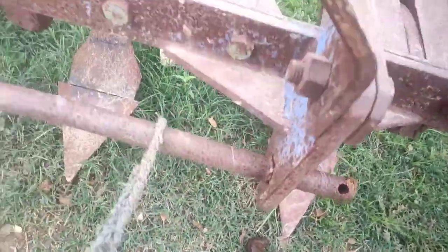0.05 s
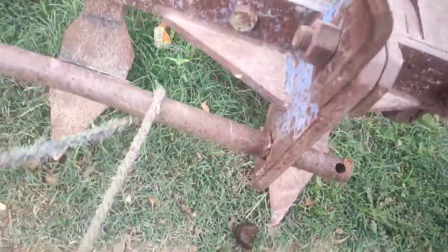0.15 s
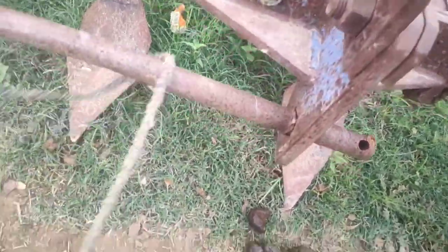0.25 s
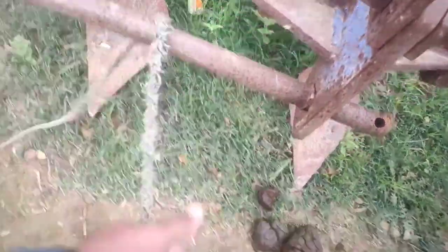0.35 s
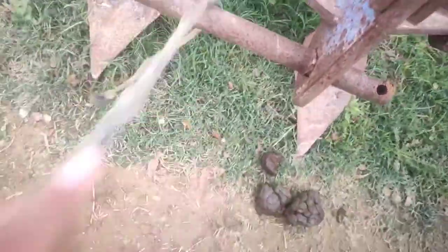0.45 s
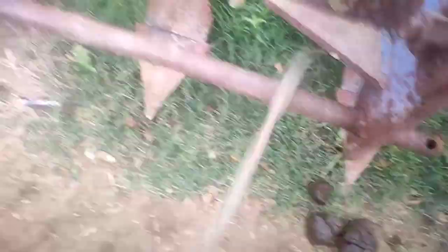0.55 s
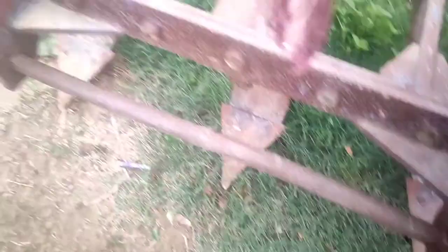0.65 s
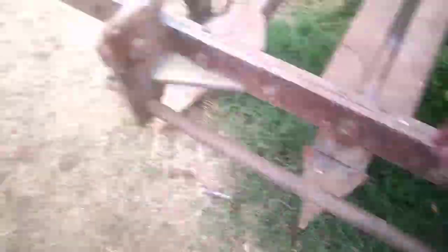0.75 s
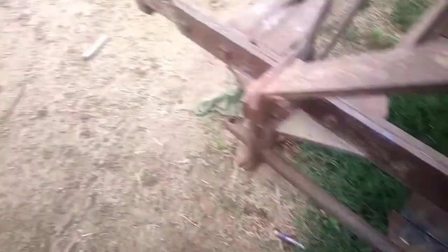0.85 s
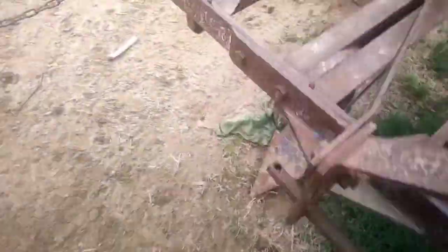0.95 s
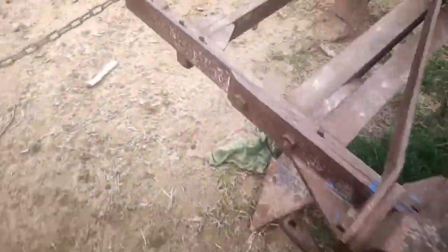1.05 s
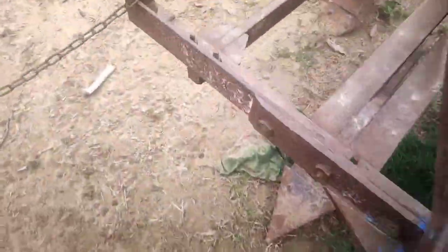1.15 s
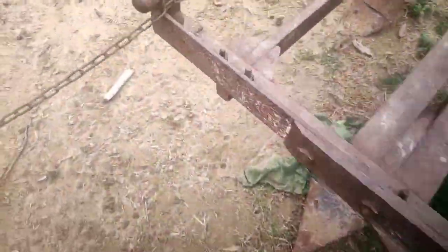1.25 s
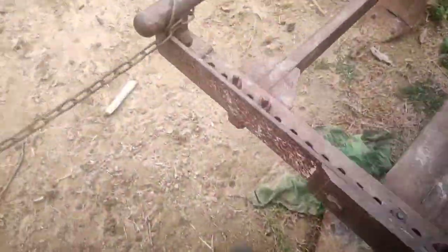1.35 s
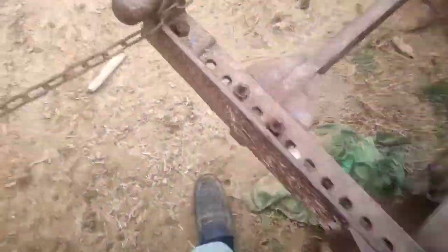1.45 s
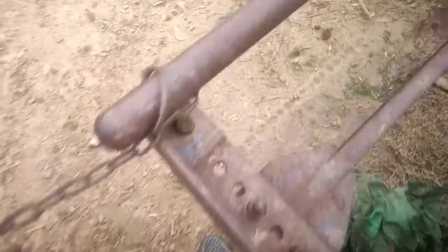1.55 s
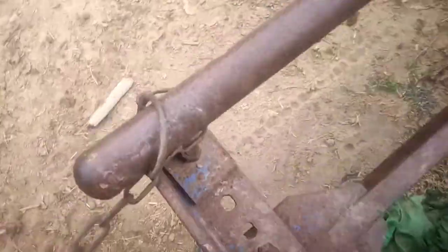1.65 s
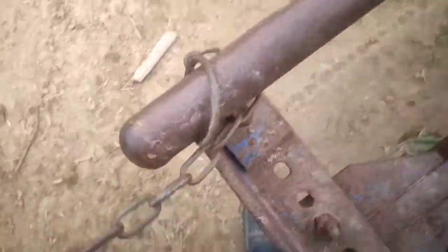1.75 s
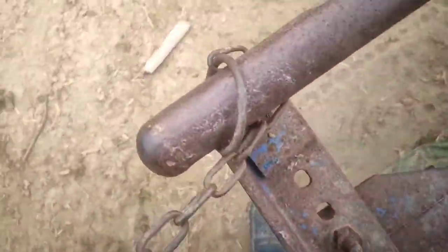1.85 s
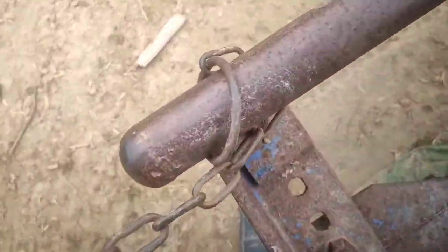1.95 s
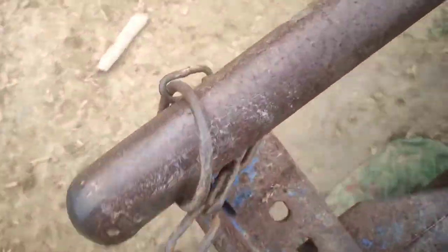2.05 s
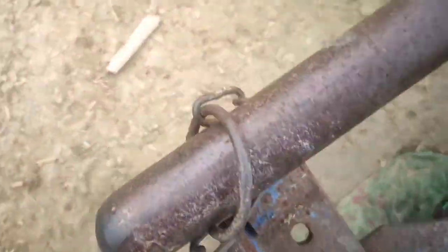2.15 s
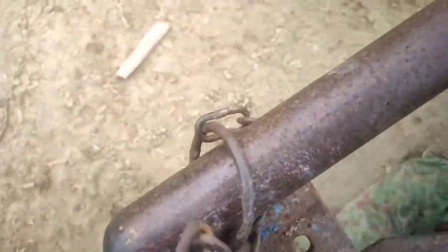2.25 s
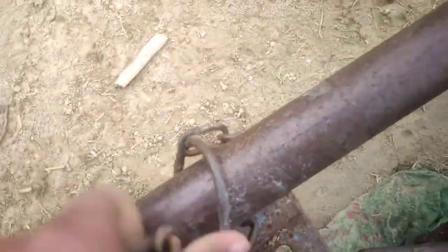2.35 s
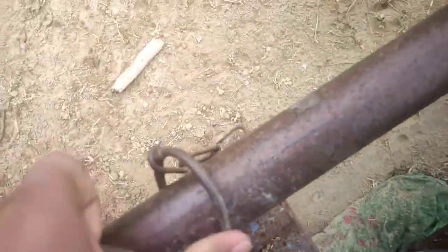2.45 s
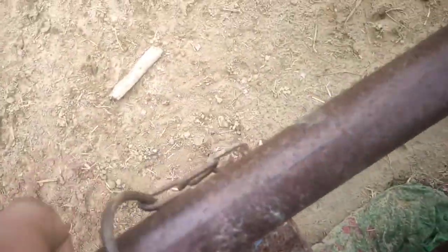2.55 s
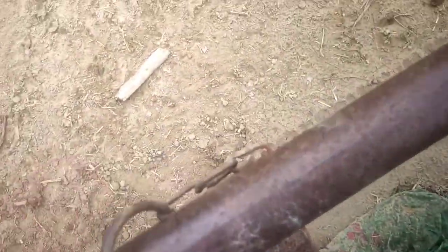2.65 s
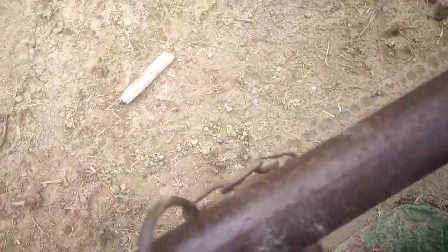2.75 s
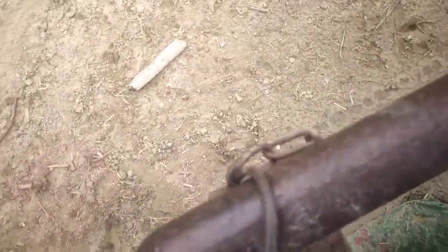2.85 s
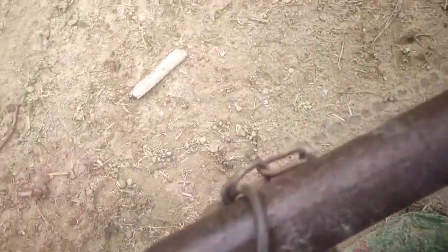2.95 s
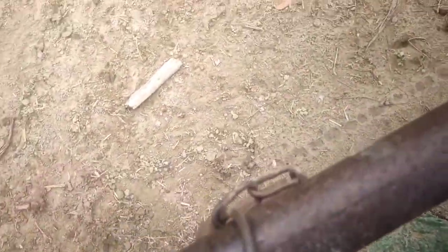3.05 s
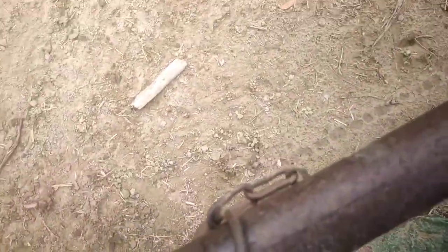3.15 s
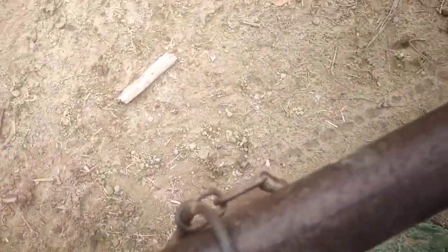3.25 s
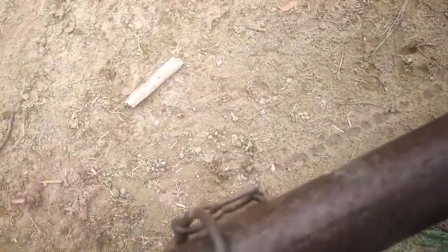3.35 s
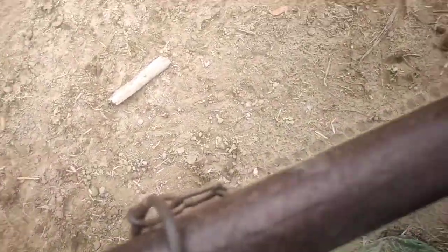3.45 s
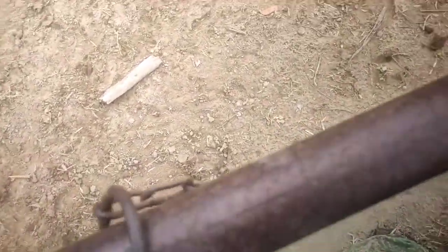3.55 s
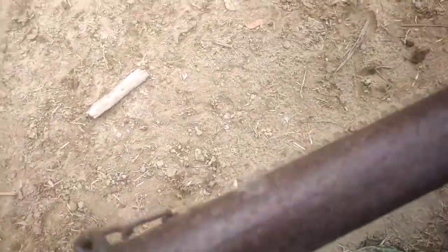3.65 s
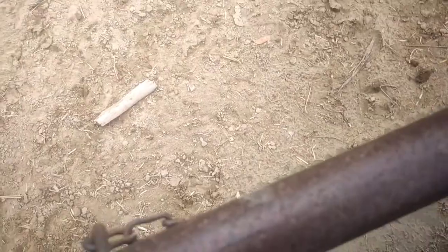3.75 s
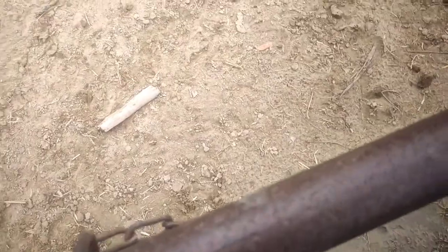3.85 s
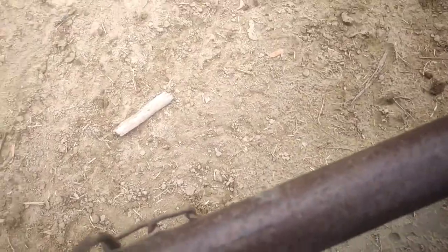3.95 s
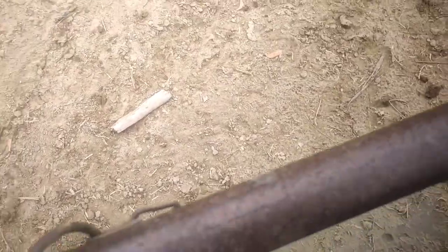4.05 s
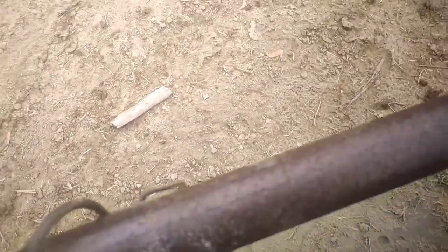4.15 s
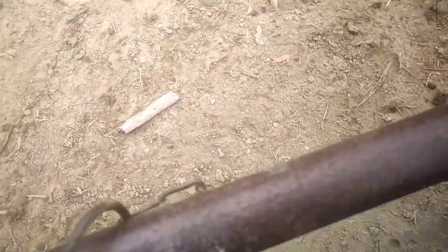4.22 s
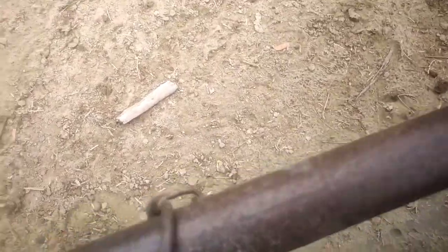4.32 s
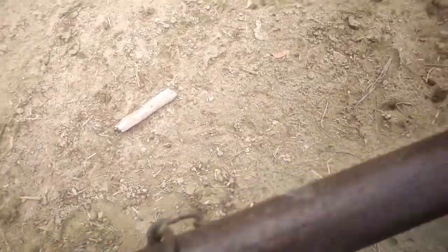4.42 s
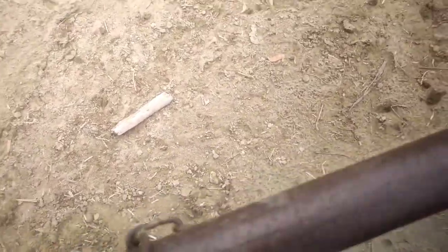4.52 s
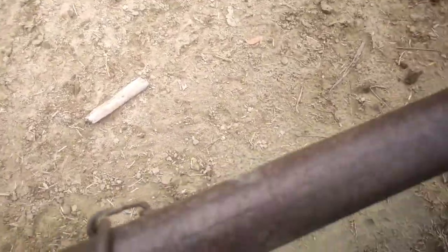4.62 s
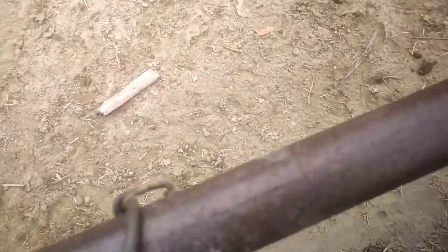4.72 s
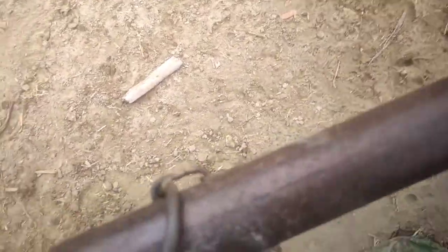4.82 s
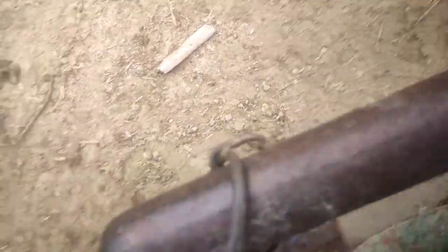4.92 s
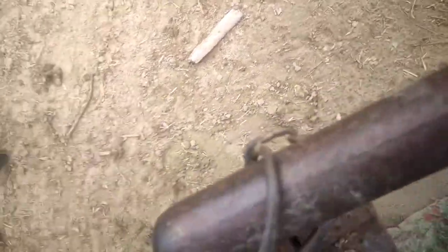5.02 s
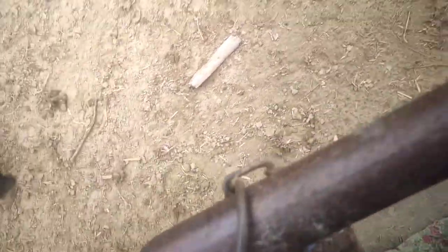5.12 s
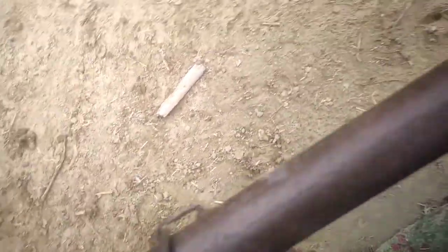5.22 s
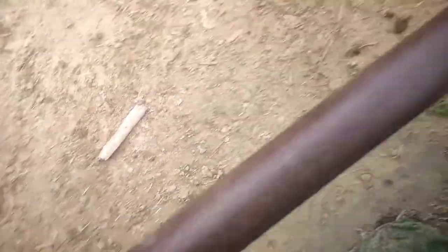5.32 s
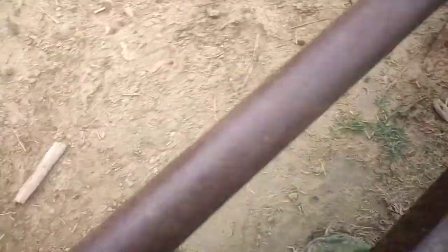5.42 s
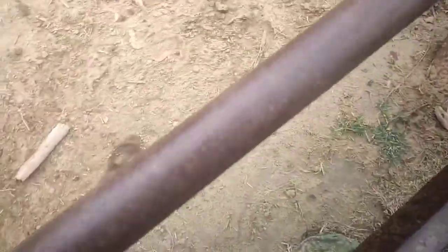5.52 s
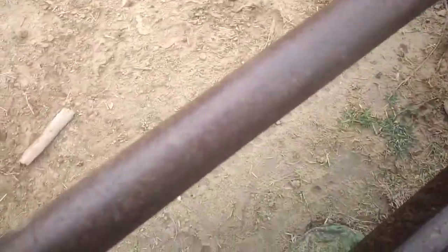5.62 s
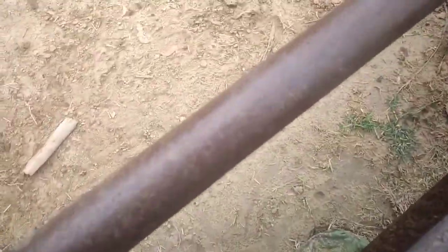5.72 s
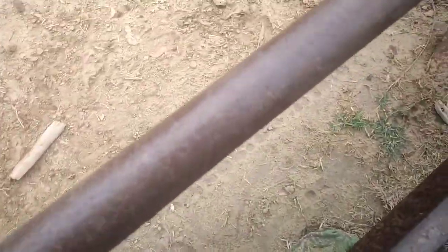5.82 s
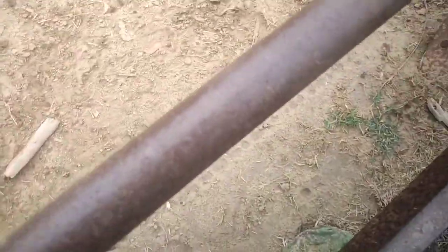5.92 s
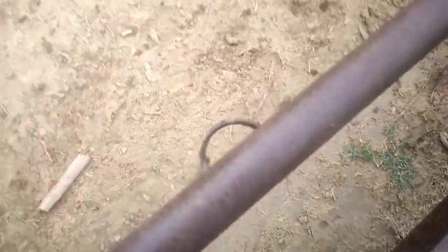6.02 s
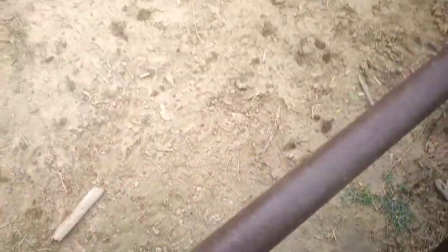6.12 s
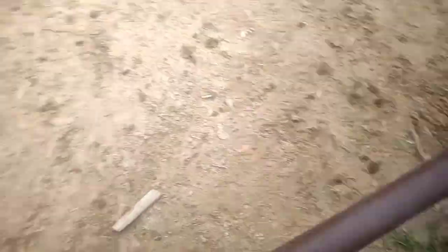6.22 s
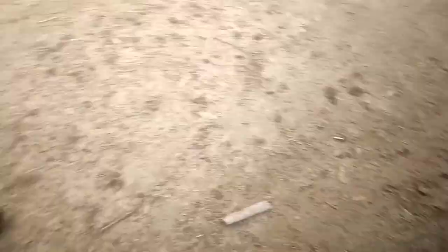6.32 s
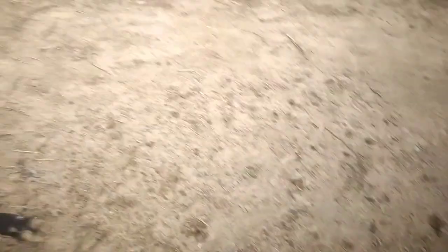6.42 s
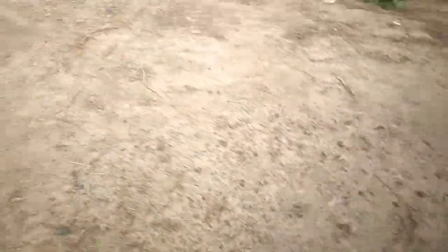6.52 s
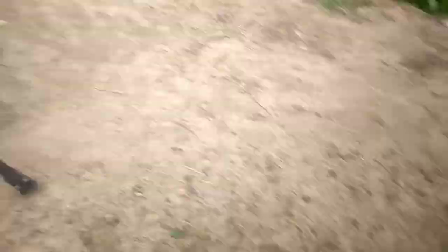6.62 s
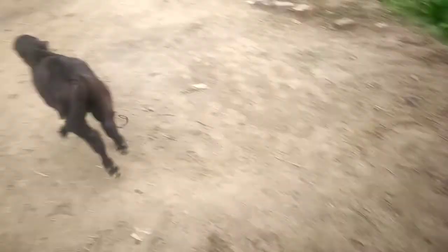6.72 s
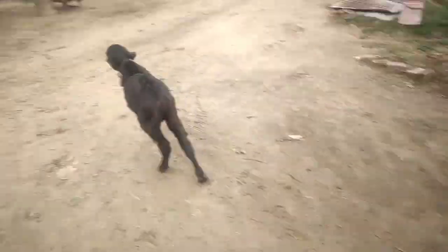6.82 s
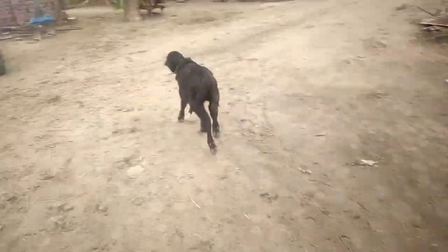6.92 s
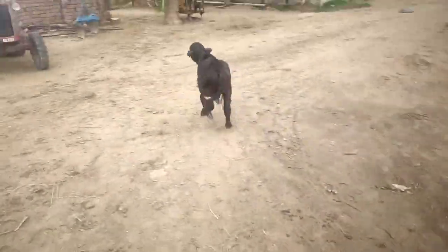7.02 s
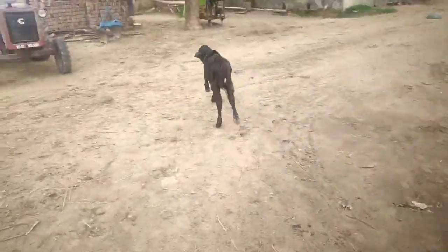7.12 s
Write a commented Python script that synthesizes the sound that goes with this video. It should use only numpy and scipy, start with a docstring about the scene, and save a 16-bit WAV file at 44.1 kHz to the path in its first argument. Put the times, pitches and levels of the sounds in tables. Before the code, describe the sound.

Close, dry stereo sound with no echo: lumpy wind rumble and muffled footsteps first, brushing grass, a crisp snap. Next, small iron links tick and scrape, with sharper clinks now and then, one ringing hard midway. Later the hook strikes twice in strong clusters, high and piercing, with a harsh chain drag and heavy iron knock. It stops quickly, leaving faint steps, light rustle and thin hiss.

```python
"""A farmyard in the open air: a chain and its hook clink, scrape and ring on a rusty iron bar.
Clinks are noise cracks that excite decaying iron modes; the hook is a set of close, beating modes, and two
thin high tinks share its top modes. The drag is uneven grit with small catches that ring the iron.
Gusts of low noise buffet two microphones. Dull steps and knocks on the iron and its frame are puffs of
pitched noise; rustling grass and dry snaps are shaped noise."""
import sys
import numpy as np
from scipy import signal
from scipy.fft import rfft, irfft
from scipy.io import wavfile
from scipy.ndimage import uniform_filter1d

SR = 44100
rng = np.random.default_rng(int(sys.argv[2]) if len(sys.argv) > 2 else 0)


def to_wav(sig):
    """Store sig (one row per channel, or 1-D mono) as 16-bit WAV at the path in sys.argv[1].

    Samples outside -1..1 are clipped; the rate is SR.
    """
    pcm = np.clip(np.atleast_2d(sig), -1, 1) * 32767
    pcm = np.round(pcm).astype(np.int16)
    wavfile.write(sys.argv[1], SR, pcm.T)  # frames by channels


N = 316197

# modes of bar, frame and links: freq_hz, level_db, t60_s
IRON_MODES = [(340, -10, .1), (660, -8, .12), (764, -10, .12), (1250, -12, .09), (1520, -8, .16),
              (1665, -3, .1), (2610, -2, .04), (2860, -4, .1), (3070, 0, .08), (3500, -3, .06),
              (4240, -6, .12), (4500, 0, .06), (4900, -4, .05), (5464, -5, .08), (5720, -4, .05),
              (6240, -2, .06), (6750, -3, .06), (7700, 0, .045), (8700, -2, .035), (9340, -3, .05),
              (9760, -2, .06), (10050, -2, .05), (10900, 1, .06), (11220, 1, .055), (11800, 0, .06),
              (12200, -1, .07), (12850, -1, .07), (13350, -3, .055), (14200, -2, .055), (14900, -1, .06)]
# the chain dragging over iron: time_s, level_db
DRAG_LEVELS = [(1.66, -65), (1.7, -54), (1.93, -66.5), (2.23, -60.5), (2.32, -64.5), (2.4, -50),
               (2.62, -54.5), (2.72, -60), (2.78, -59.5), (2.95, -60.5), (3.53, -61.5), (3.83, -57.5),
               (4.01, -58.5), (4.34, -59.5), (4.48, -56.5), (4.58, -84), (4.76, -79.5), (4.8, -57),
               (5.23, -70), (5.36, -58), (5.5, -52.5), (5.72, -47), (5.76, -21), (5.86, -31.5),
               (5.93, -40.5), (5.99, -20), (6.09, -34.5), (6.13, -59), (6.33, -56.5), (6.4, -82)]


def gain_of(db):
    """Decibels to gain."""
    return 10 ** (np.asarray(db) / 20)


def evened(x):
    """Scales to rms 1."""
    return x / np.sqrt(np.mean(abs(x) ** 2) + 1e-20)


def read(points, hz):
    """Reads a spectrum in dB, interpolated along log frequency."""
    f, value = np.transpose(points)
    return np.interp(np.log(hz + 1), np.log(f + 1), value)


def sides(pan_db):
    """Left and right gains from a left-right level difference."""
    return gain_of(np.array([pan_db / 2, -pan_db / 2]))


def add(mix, s, sound):
    """Mixes a sound in at a time in seconds."""
    part = mix[:, round(s * SR):][:, :sound.shape[1]]
    part += sound[:, :part.shape[1]]


def coloured(x, points, at, tilt, pivot_hz, size):
    """Filters x to a spectrum whose tilt (dB per octave) moves over time, at constant power."""
    overlap = size * 3 // 4
    hz, t, z = signal.stft(x, SR, nperseg=size, noverlap=overlap)
    octaves = np.log2((hz[:, None] + 10) / pivot_hz)
    shape = gain_of(read(points, hz)[:, None] + octaves * np.interp(t, at, tilt))
    shape = shape / np.sqrt((shape ** 2).mean(0))
    return signal.istft(z * shape, SR, nperseg=size, noverlap=overlap)[1][:, :N]


def rings(modes, length, detune=1):
    """One exponentially decaying complex tone per mode; length in seconds."""
    t = np.arange(round(length * SR)) / SR
    hz, db, t60 = np.array(modes).T[:3, :, None]
    return gain_of(db - 60 * t / t60) * np.exp(2j * np.pi * hz * np.reshape(detune, (-1, 1)) * t)


def detuned_iron(length):
    """Iron modes shifted slightly at random, since no two links are quite alike."""
    return rings(IRON_MODES, length, 1 + .015 * rng.standard_normal(len(IRON_MODES)))


def random_phases(count):
    """Gives each microphone its own phase for every mode."""
    return np.exp(2j * np.pi * rng.random((2, count)))


def hiss():
    """The steady noise floor of yard and microphones."""
    # floor spectrum: freq_hz, relative_db
    floor_spectrum = [(180, -30.5), (300, -5), (399, -12.5), (820, -12.5), (3530, -19), (5640, -16.5),
                      (13000, -15.5), (15400, -18), (16500, -39)]
    level_db = -66.5
    noise = rng.standard_normal((2, N))
    return gain_of(level_db) * coloured(noise, floor_spectrum, [0], [0], 1000, size=1024)


def wind():
    """Lumpy low noise, unrelated at the two sides: a breeze, gusts, and one low thump under a blow."""
    # gusts, and at 4.18 s the low thump under a blow: peak_time_s, level_db, left_right_db
    low_swells = [(.33, -34, -19.5), (.42, -47.5, -21), (0.521, -37.5, -12), (.58, -38, 3), (.68, -64, 8),
                  (0.818, -37.5, -1), (.87, -42, 2), (0.969, -36.5, -3), (1.05, -40, -3), (1.12, -48, 4),
                  (1.24, -58, -8), (1.559, -45.5, -9), (1.86, -57.5, -15), (4.18, -47, -5),
                  (4.729, -45, -4), (6.692, -41, -11)]
    # breeze: time_s, level_db
    breeze = [(0, -40.5), (1.05, -41.5), (1.4, -45.5), (2.45, -51), (3.3, -48.5), (4.1, -50), (4.55, -50.5),
              (5, -49.5), (5.4, -51), (6, -50.5), (6.35, -46.5), (7.17, -50)]
    # buffeting spectrum before tilt: freq_hz, relative_db
    buffet = [(8.8, -25.5), (15, 0), (61, -2.5), (183, -16.5), (409, -33), (454, -32), (597, -50),
              (900, -44.5), (1170, -69), (1980, -120)]
    rise_s, fall_s, breeze_pan_db = 0.029, 0.035, -2
    # stronger noise reaches higher: tilt in dB per octave at -48 dB, and its rise per dB of level
    tilt_db, tilt_per_db = -2.5, 0.2063
    t = np.arange(N) / SR
    wander = uniform_filter1d(uniform_filter1d(rng.standard_normal((2, N)), 900), 900)
    lumps = gain_of(1.1 * evened(wander))
    level = gain_of(np.interp(t, *np.transpose(breeze))) * sides(breeze_pan_db)[:, None]
    for s, db, pan_db in low_swells:
        swell = np.exp(-((t - s) / np.where(t < s, rise_s, fall_s)) ** 2)
        level = level + swell * gain_of(db) * sides(pan_db)[:, None]
    tilt = tilt_db + tilt_per_db * (20 * np.log10(level.mean(0)) + 48)
    noise = rng.standard_normal((2, N))
    return coloured(noise, buffet, t, tilt, 60, size=2048) * lumps * level


def thuds():
    """Dull low steps, iron knocks and a frame thud: a decaying puff of noise in a band around one pitch."""
    # thuds: start_s, peak_db before panning, pitch_hz
    dull_hits = [(0.09, -46.5, 283), (0.326, -37, 390), (0.384, -47, 288), (0.528, -37, 323),
                 (0.688, -52, 370), (0.784, -48, 270), (0.948, -37, 268), (1.83, -51, 283),
                 (1.935, -43.5, 312), (3.034, -48.5, 350), (5.465, -33, 840), (5.466, -32, 129),
                 (6.018, -17, 796), (6.023, -21, 130), (6.025, -28, 44.6), (6.05, -17, 800),
                 (6.531, -53, 363), (6.595, -49.5, 283), (6.651, -44, 301), (6.673, -38.5, 314),
                 (6.81, -49.5, 717), (6.888, -41.5, 296), (6.954, -47, 770), (7.066, -55.5, 300),
                 (7.14, -48.5, 908)]
    decay_cycles, shortest_t60_s, pan_db = 16, 0.025, -0.5
    out, t = np.zeros((2, N)), np.arange(4000) / SR
    for s, db, hz in dull_hits:
        band = signal.butter(2, [hz * .55, hz * 1.5], "band", fs=SR, output="sos")
        # mostly shared by both sides, with a little of its own on each
        push = rng.standard_normal(4000) + .5 * rng.standard_normal((2, 4000))
        fall = gain_of(-60 * t / max(decay_cycles / hz, shortest_t60_s))
        puff = signal.sosfilt(band, push * fall)
        add(out, s, puff / abs(puff).max() * gain_of(db) * sides(pan_db)[:, None])
    return out


def shuffle():
    """Feet and rope brushing dry grass and dust: a fine, slightly uneven rustle that rings nothing."""
    # rustle: time_s, level_db, tilt_db_per_octave
    rustle_levels = [(0, -51, 9), (.1, -67.5, 6.5), (.29, -54.5, 8), (.58, -53.5, 5), (.66, -68, 1),
                     (1.271, -66, 6), (1.29, -57.5, 3), (1.37, -49, 4.5), (1.46, -56, 5), (1.54, -52.5, 3),
                     (1.7, -65, 9), (1.8, -89, -1), (6.3, -92, 4.5), (6.4, -68, 2), (6.751, -59, 4.5),
                     (6.94, -65.5, 5.5), (7.17, -69.5, 2)]
    # brushing spectrum before tilt: freq_hz, relative_db
    brush = [(300, -39), (600, 4), (2000, 0.5), (3300, -1), (4600, -7), (7000, -12), (10000, -12),
             (12500, -15.5), (15300, -17), (16500, -37.5)]
    pan_db = 3.3
    at, db, tilt = np.transpose(rustle_levels)
    t = np.arange(N) / SR
    uneven = gain_of(0.56 * evened(uniform_filter1d(rng.standard_normal(N), 400)))
    noise = evened(rng.standard_normal((2, N)) * uneven)
    rustle = coloured(noise, brush, at, tilt, 5000, size=512)
    return rustle * gain_of(np.interp(t, at, db)) * sides(pan_db)[:, None]


def ticks():
    """Dry snaps of stalks and grit: short bursts over a wide band, with no ring."""
    # snaps: start_s, level_db, centre_hz, t60_s
    snaps = [(0.285, -50.5, 8060, 0.017), (0.336, -49.5, 4730, 0.12), (0.556, -34.5, 3400, 0.098),
             (.625, -50, 8000, 0.019), (.946, -51, 13200, 0.022), (1.288, -32, 8400, 0.0082),
             (1.299, -39, 8800, 0.015), (1.329, -47.5, 8000, .018), (1.373, -45.5, 5760, 0.035),
             (6.188, -44.5, 8750, 0.017), (6.591, -61.5, 2960, 0.039), (6.675, -47.5, 10700, 0.047),
             (6.786, -50, 12000, .025)]
    pan_db = 7.5
    out, t, hz = np.zeros((2, N)), np.arange(4096) / SR, np.fft.rfftfreq(4096, 1 / SR)
    fade_out = np.minimum(gain_of(-30 * (t - .08) / .005), 1)
    for s, db, centre_hz, t60 in snaps:
        attack = 1 + 1.9 * np.exp(-t / 0.0026)
        burst = rng.standard_normal((2, 4096)) * gain_of(-60 * t / max(t60, .004)) * attack
        band = gain_of(-5. * np.log2((hz + 50) / centre_hz) ** 2)
        burst = irfft(rfft(burst) * band) * fade_out
        level = np.sqrt(t60 * SR / 2) * gain_of(db)
        add(out, s, burst / np.linalg.norm(burst) * level * sides(pan_db)[:, None])
    return out


def rung_iron(catches):
    """Catches excite the iron at changing places, each weighing the modes anew; contact damps the ring."""
    place_s, place_spread_db, damp_db_per_s = .04, 3.5, 350
    t = np.arange(N) / SR
    place = rng.integers(0, 8, N)[(t / place_s).astype(int)]
    rung = 0
    for k in range(8):
        weigh = gain_of(place_spread_db * rng.standard_normal(len(IRON_MODES)))
        weigh = weigh * random_phases(len(IRON_MODES))
        body = (weigh @ detuned_iron(.2)).real
        body = body * gain_of(-damp_db_per_s * t[:body.shape[1]])
        body = body / np.linalg.norm(body[0])
        rung = rung + signal.oaconvolve(catches * (place == k), body, axes=1)[:, :N]
    return rung


def scrape():
    """The chain drags over iron: dense uneven grit, with quick catches of link on rust that ring it."""
    # short noise ramps that rise and break off as a knock begins: start_s, length_s, end_level_db
    ramps = [(1.669, 0.029, -47.5), (2.642, 0.017, -33), (2.777, 0.014, -28.5), (4.169, 0.0074, -23.5),
             (4.275, 0.035, -31)]
    # grit spectrum before tilt: freq_hz, relative_db
    grit_spectrum = [(180, -54.5), (300, -32), (1380, -8), (1580, -6.5), (4390, -0.5), (7130, -3.5),
                     (11600, -7), (15400, -15), (16500, -32)]
    # spectrum of the catches before tilt: freq_hz, relative_db
    catch_spectrum = [(700, -8), (1600, 2), (3000, -1), (6000, 0.5), (15000, 2)]
    # harder dragging is brighter: tilt in dB per octave at -47 dB, and its rise per dB of level
    tilt_db, tilt_per_db = -0.96, 0.23
    grit_db, catch_db, catches_per_s, pan_db = -4, 2.5, 350, 0.73
    at, db = np.transpose(DRAG_LEVELS)
    tilt = tilt_db + tilt_per_db * (db + 47)
    t = np.arange(N) / SR
    level = gain_of(np.interp(t, at, db, left=-200, right=-200))
    for s, length, end_db in ramps:
        level = level + gain_of(end_db) * np.interp(t, [s, s + length, s + length + 0.01], [0, 1, 0])
    slow = evened(uniform_filter1d(rng.standard_normal(N), 200))
    quick = evened(uniform_filter1d(rng.standard_normal(N), 25))
    uneven = gain_of(2. * slow + 2. * quick)
    grit = evened(rng.standard_normal((2, N)) * uneven)
    grit = coloured(grit, grit_spectrum, at, tilt, 5000, size=256) * level * gain_of(grit_db)
    # catches come more often where the grit is rough
    caught = rng.random(N) < catches_per_s * uneven ** 2 / SR
    strength = gain_of(3.5 * np.minimum(rng.exponential(1, N), 4))
    catches = evened(caught * strength * rng.choice([-1, 1], N))[None]
    catches = coloured(catches, catch_spectrum, at, tilt, 5000, size=256) * level * gain_of(catch_db)
    return (grit + rung_iron(catches)) * sides(pan_db)[:, None]


def hook():
    """Hook blows and two thin high tinks ring four weighted mode groups, the right side 1 radian ahead."""
    # hook blows, then at 6.36 and 7.115 s two thin high tinks near 14.7 kHz:
    # start_s, long_pair_db, middle_group_db, high_group_db, top_modes_db
    strikes = [(2.604, -52, -41, -67, -46), (2.795, -41, -43, -34, -45.5),
               (3.279, -63, -48.5, -51.5, -59.5), (4.296, -48, -46.5, -35.5, -46.5),
               (5.468, -17, -33.5, -6, -27.5), (5.487, -21.5, -20, -19, -41), (5.518, -35.5, -30, -19, -20),
               (6, -32.5, -25, -12, -19), (6.033, -29, -16.5, -10.5, -15), (6.066, -4.5, -23.5, -19.5, -16),
               (6.36, -81.5, -77, -83, -44), (7.115, -76, -78.5, -84, -35.5)]
    # ringing modes, where close pairs of opposite sign swell and beat:
    # freq_hz, level_db, t60_s, left_right_db, sign, group (index)
    hook_modes = [(4166, -2, .32, 8, -1, 0), (4188, 0, .32, 15, 1, 0), (1520, -36, .4, 8, 1, 0),
                  (1600, -38, .3, 4, 1, 0), (6751, -20, .16, 3, 1, 0), (4100, 0, .4, 14, 1, 1),
                  (4242, -3, .25, 2, -1, 1), (5460, -10, .12, 0, 1, 1), (6325, -10, .1, 2, -1, 1),
                  (11180, -12, .2, 5, 1, 2), (11524, -2, .16, 12, -1, 2), (11634, -3, .16, 0, 1, 2),
                  (11729, -1, .17, -4, 1, 2), (11809, -6, .15, -4, -1, 2), (11927, -7, .13, 3, 1, 2),
                  (12880, -9, .09, 3, -1, 2), (13488, -10, .11, 2, 1, 2), (14660, -15, .14, 6, -1, 3),
                  (14690, -12, .14, 6, 1, 3)]
    out, tones = np.zeros((2, N)), rings(hook_modes, .6)
    pan, sign, group = np.array(hook_modes)[:, 3:].T
    heard = sign * gain_of([0 * pan, -pan]) * np.exp([[0], [1j]])
    for s, *group_db in strikes:
        weights = gain_of(np.array(group_db)[group.astype(int)])
        add(out, s, (weights * heard @ tones).imag)
    return out


def strays(count=40):
    """Small knocks at chance moments of the drag, their level following it; rows as for the clinks."""
    over_drag_db, spread_db = 10, 2.5
    low_db, treble_db, chatter_t60_s = -20.5, 0.5, 0.056
    at, db = np.transpose(DRAG_LEVELS)
    when, size = rng.random((count, 2)).T
    # one knock at random within each equal slice of the drag
    s = at[0] + (at[-1] - at[0]) * (np.arange(count) + when) / count
    level_db = np.interp(s, at, db) + over_drag_db + spread_db * (2 * size - 1)
    return [(a, b, low_db, treble_db, chatter_t60_s) for a, b in zip(s, level_db)]


def clinks():
    """Links knock on iron: a burst of chatter makes a broad crack and rings modes picked at random."""
    # knocks: start_s, level_db (energy as if spent in a single click), low_db, treble_db, chatter_t60_s
    knocks = [(1.708, -17, -20.5, 1.5, 0.052), (1.8255, -34, -16, -12, 0.071),
              (2.1482, -34.5, -16, -7.5, 0.061), (2.1761, -35, -15, -4, 0.13), (2.1993, -26, -18, 0, 0.05),
              (2.332, -28, -17, -7, 0.059), (2.366, -7, -7, 10.5, 0.013), (2.381, -14, -28, 2, 0.056),
              (2.4475, -19, -19, 6.5, 0.078), (2.4943, -26.5, -12, -7, 0.024),
              (2.5394, -20.5, -19.5, -10, 0.033), (2.5526, -24, -16, -11, 0.18),
              (2.609, -31, -32, -15, 0.017), (2.6586, -11, -17.5, -5, 0.037),
              (2.7511, -23, -13, -27.5, 0.15), (2.7691, -26.5, -0.5, -3, 0.02),
              (2.7963, 1.5, -7.5, 5.5, 0.038), (2.9243, -28.5, -14.5, -4, 0.044),
              (3.214, -36, -20, -7, 0.061), (3.2788, -11.5, -16.5, 4.5, 0.07), (3.405, -44, 2, 23, .05),
              (3.4317, -45, -1, -24, 0.09), (3.52, -41.5, -6, -15, 0.039),
              (3.5944, -30.5, -22, -8.5, 0.092), (3.65, -21.5, -10.5, -0.5, 0.081),
              (3.709, -22, -19.5, -4, 0.058), (3.7278, -16.5, -20, 6, 0.076), (3.904, -33, -11, -10.5, .08),
              (3.934, -29, -9.5, -5.5, 0.12), (4.0316, -33, -5, -3, 0.06), (4.1752, -9, -9, 5.5, 0.049),
              (4.2942, 3, -3, 8, 0.046), (4.3097, -4.5, -28, 1, 0.038), (4.4601, -34.5, -22, -8, 0.022),
              (4.789, -43.5, -29, -13, .14), (4.856, -42, -41, -14, 0.029), (5.1711, -31, -13, -2.5, 0.043),
              (5.248, -32.5, -10, 2, 0.21), (5.277, -36.5, -14, -4, 0.062), (5.466, -2, 2, 3, 0.042),
              (5.517, 0.5, -13.5, 7, 0.051), (5.5805, -17, -13.5, 0.5, 0.053), (5.614, -26, -16, 19, 0.072),
              (5.6543, -33, -20, -29, 0.038), (5.75, -17, -15, -9, .15), (5.7822, -8.5, -17, 3, 0.13),
              (5.8018, -34, -30, -4, .13), (5.821, -24, -24, -10, 0.19), (5.8526, -15.5, -9, 15, 0.033),
              (5.8713, -25, -23, -20, 0.022), (5.905, -13, -26, -1, 0.024),
              (5.9461, -4.5, -12.5, 9.5, 0.12), (5.9778, -11.5, -47.5, -3.5, 0.053),
              (6, 0.5, -14.5, 0.5, 0.15), (6.0202, -2, -6.5, -0.5, 0.085), (6.0452, 0.5, 0, 1.5, 0.045),
              (6.0692, -8.5, -13, -1, 0.037), (6.2433, -31, -8, -13, 0.16)]
    # crack spectrum before each knock's balance: freq_hz, relative_db
    crack_spectrum = [(59, -48), (100, -13), (1270, -13), (2800, -14.5), (3700, -20), (4290, -14),
                      (7170, -17), (7650, -10.5), (11700, -12.5), (15500, -11), (16500, -46)]
    ring_over_crack_db, pan_db, click_s = 1, 3, 0.00092
    out, t = np.zeros((2, N)), np.arange(6000) / SR
    links = [detuned_iron(6000 / SR) for _ in range(8)]
    mode_hz, hz = np.array(IRON_MODES)[:, 0], np.fft.rfftfreq(8192, 1 / SR)
    dull = 1 / (1 + (hz / 5000) ** 4)
    attack = np.minimum(t / 0.00068, 1) * (1 + 0.5 * np.exp(-t / 0.00033))
    for s, db, low_db, high_db, t60 in knocks + strays():
        balance = [(900, low_db), (3500, 0), (11000, high_db)]
        fall = gain_of(-60 * t / max(t60, .006))
        chatter = gain_of(4. * evened(uniform_filter1d(rng.standard_normal(6000), 30)))
        grit = rng.standard_normal((2, 6000)) * chatter * attack
        # the treble of the crack dies first
        crack = rfft(grit * fall, 8192) * (1 - dull) + rfft(grit * fall ** 0.44, 8192) * dull
        crack = irfft(crack * gain_of(read(crack_spectrum, hz) + read(balance, hz)))[:, :6000]
        # two links meet in every knock
        pair = np.vstack([links[k] for k in rng.choice(8, 2, replace=False)])
        pick_db = 4. * rng.standard_normal((2, len(IRON_MODES))) + read(balance, mode_hz)
        pick = gain_of(pick_db).ravel()
        # links that stay in touch damp the ring
        ring = ((pick * random_phases(len(pick))) @ pair).real * fall ** .12
        # the first 900 samples of the chatter strike the modes
        ring = signal.fftconvolve(ring, (grit * fall)[:1, :900], axes=1)[:, :6000]
        ring = gain_of(ring_over_crack_db) * ring / np.linalg.norm(ring)
        knock = crack / np.linalg.norm(crack) + ring
        add(out, s, knock * np.sqrt(click_s * SR) * gain_of(db) * sides(pan_db)[:, None])
    return out


def scene():
    """All sources in open air, summed without reverberation."""
    background = hiss() + wind() + thuds() + shuffle() + ticks()
    return background + scrape() + hook() + clinks()


def record(dry):
    """A limiter holds the loudest blows down; soft saturation and a low-pass band limit follow."""
    threshold_db, recovery_db_per_s, reduction_per_db, edge_hz = -13.5, 130.0, 0.43, 15800
    power_db = 10 * np.log10(abs(uniform_filter1d((dry ** 2).max(0), 130)) + 1e-12)
    # the detected level rises at once and falls at a steady rate
    recovered_db = np.arange(N) * recovery_db_per_s / SR
    held_db = np.maximum.accumulate(power_db + recovered_db) - recovered_db
    over_db = np.maximum(held_db - threshold_db, 0)
    held = dry / gain_of(reduction_per_db * uniform_filter1d(over_db, 60))
    saturated = 0.91 * np.tanh(held / 0.75)
    low_pass = signal.firwin(95, edge_hz, window=("kaiser", 9), fs=SR)
    return signal.oaconvolve(saturated, low_pass[None], "same")


dry = scene()
out = record(dry)
to_wav(out)
```